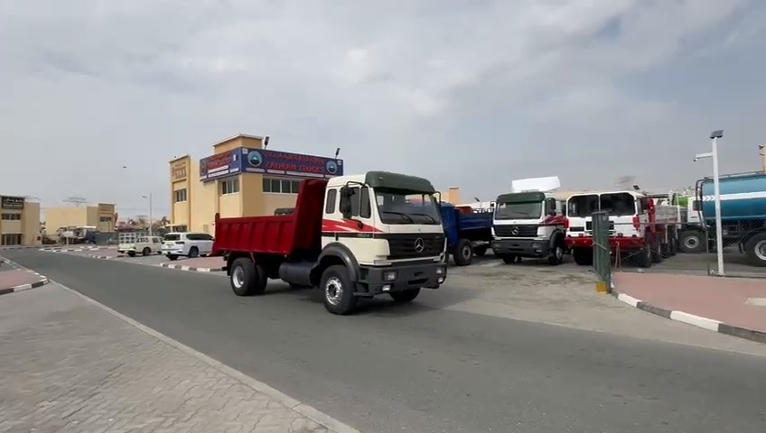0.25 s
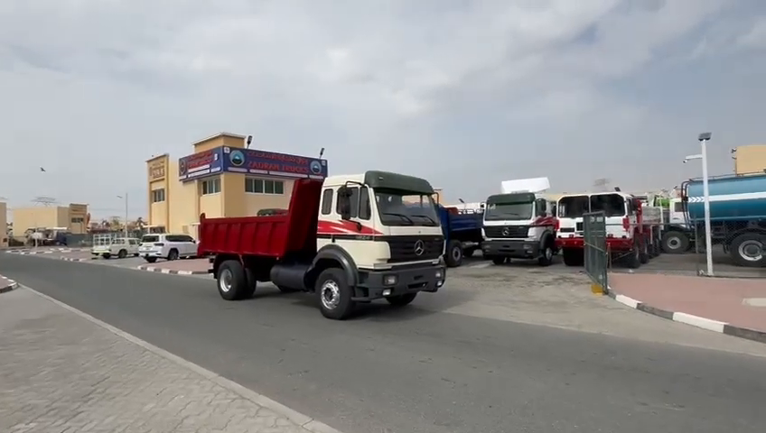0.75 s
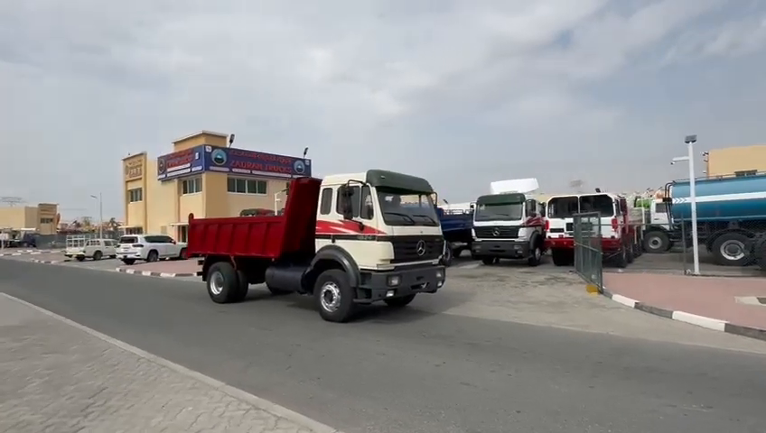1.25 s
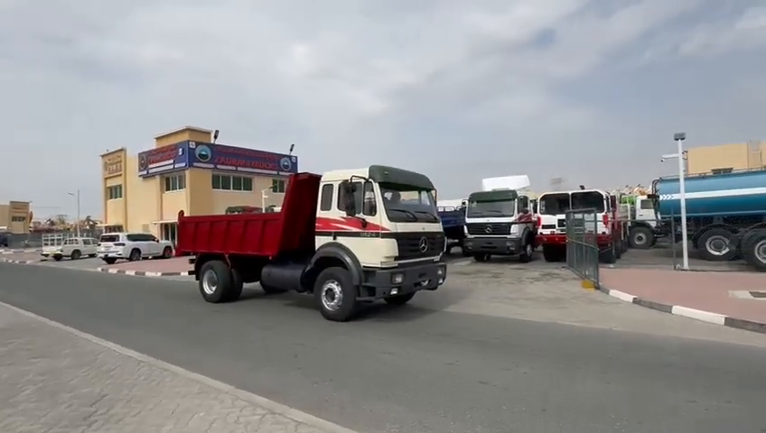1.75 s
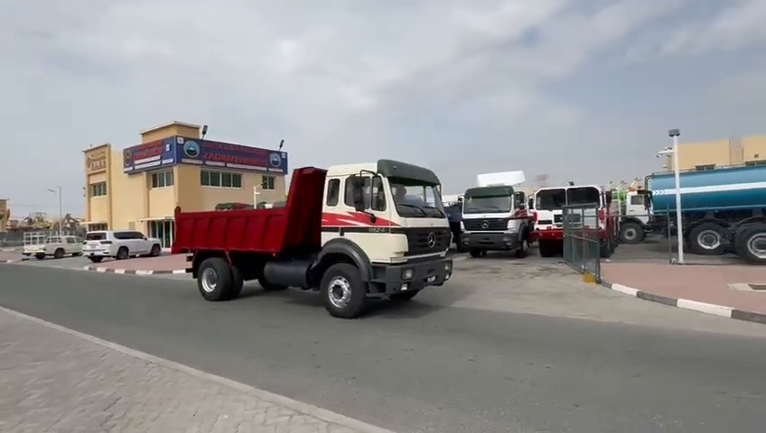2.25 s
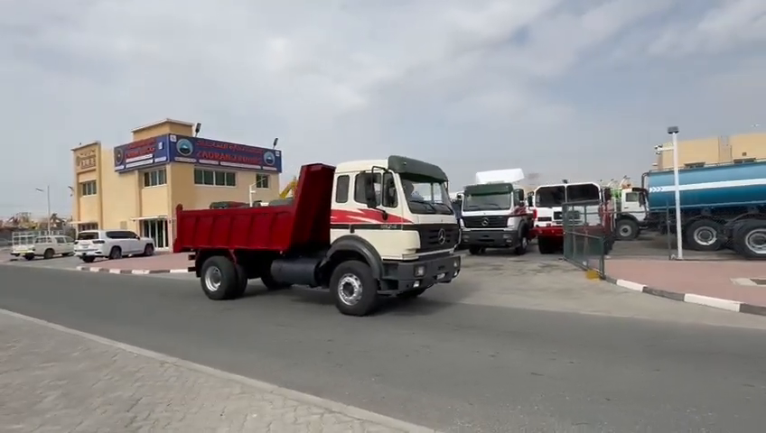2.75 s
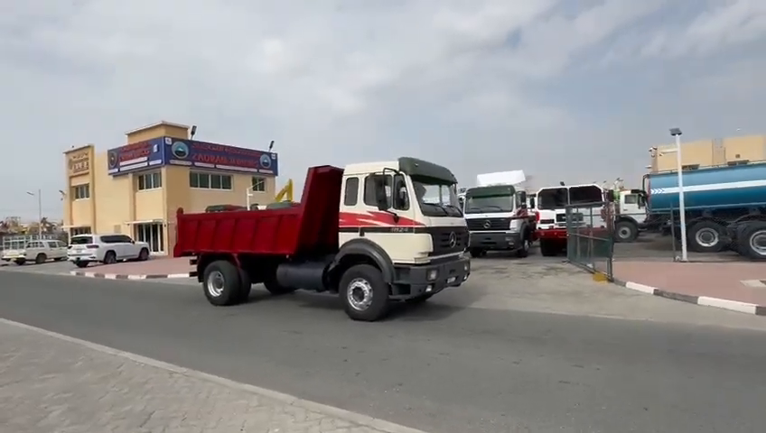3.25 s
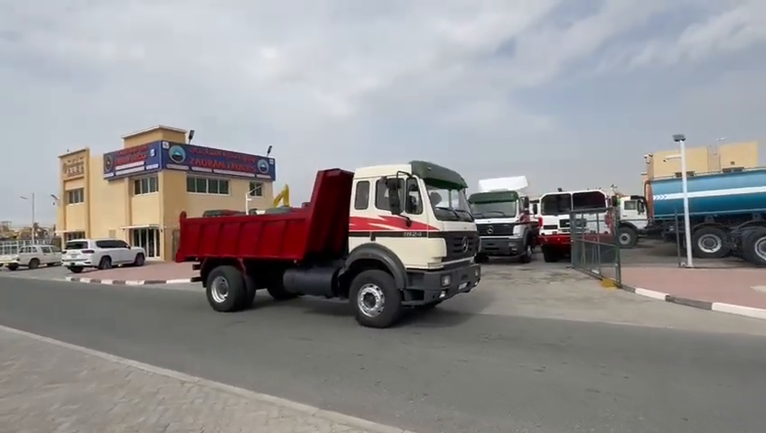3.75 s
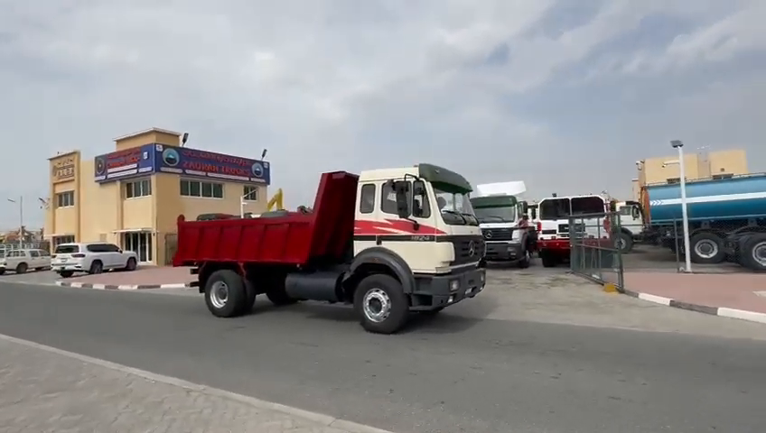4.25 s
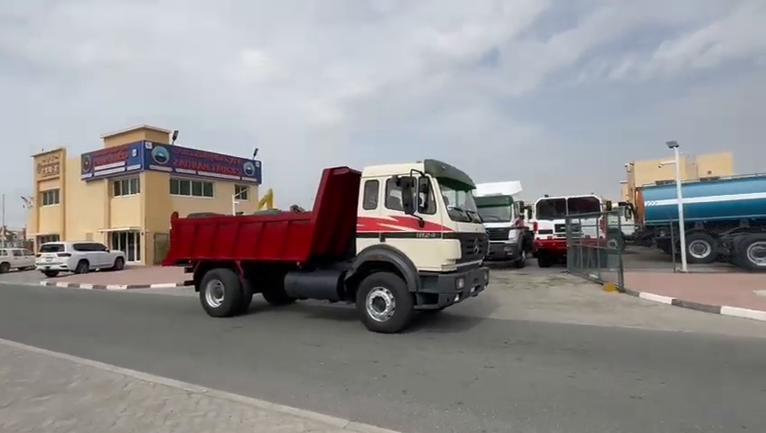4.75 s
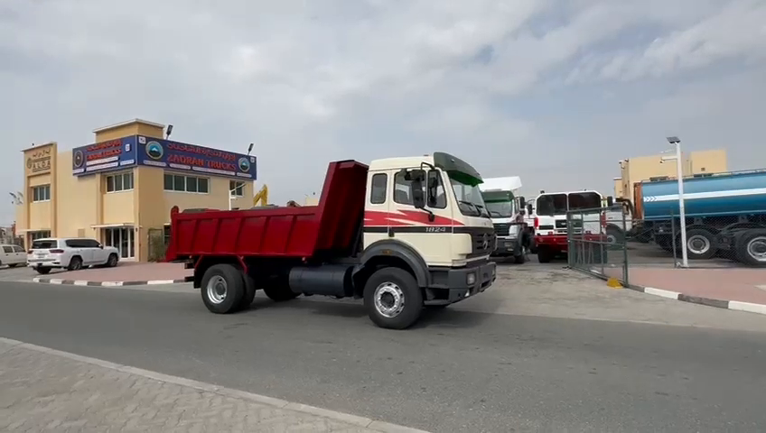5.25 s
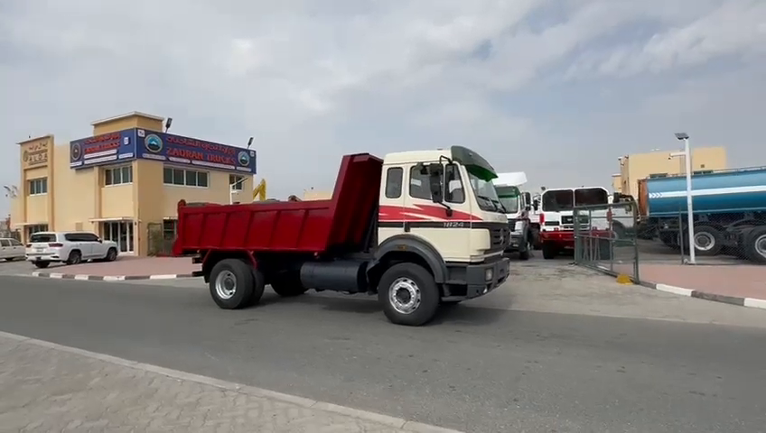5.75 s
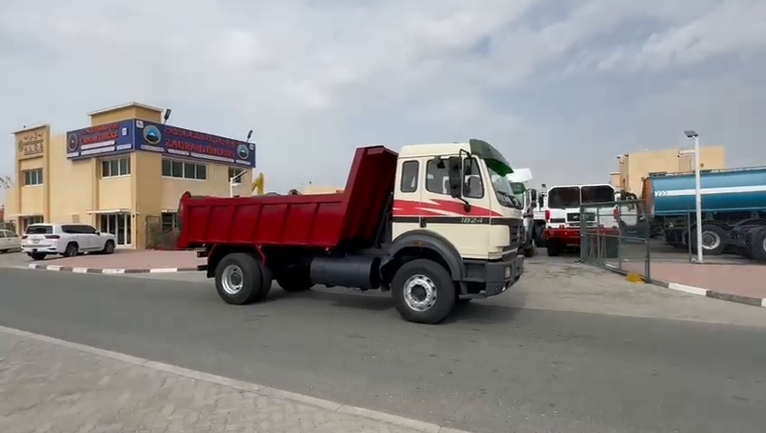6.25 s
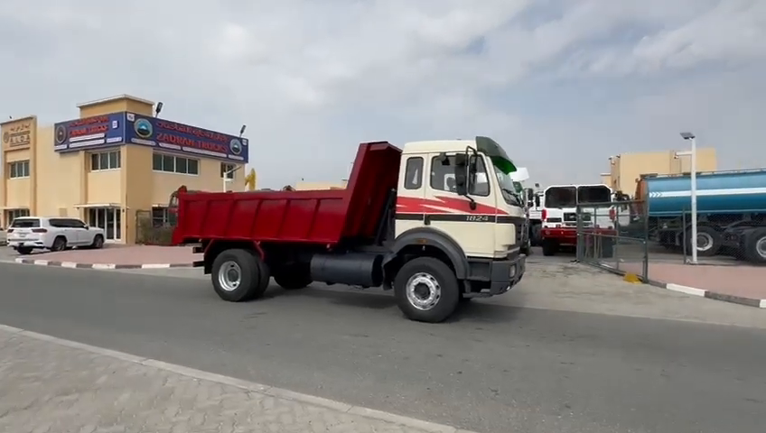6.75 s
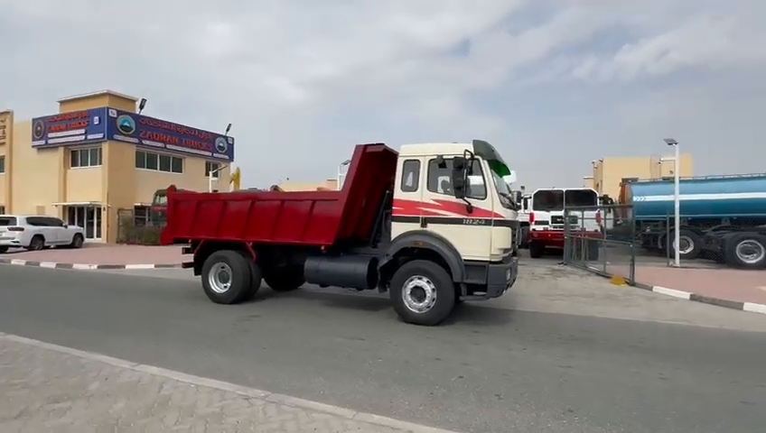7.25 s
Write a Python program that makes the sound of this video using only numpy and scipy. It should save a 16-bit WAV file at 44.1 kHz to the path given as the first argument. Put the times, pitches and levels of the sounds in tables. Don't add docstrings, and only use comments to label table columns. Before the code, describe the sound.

In an open roadside yard, a six-cylinder diesel idles with a steady rapid knock and rough roar, slightly duller at first and closer after two seconds. Around four seconds the empty steel tipper body clanks and brake air bursts out. Strong gusts slap the handheld phone at mid-point, then short air puffs and metal rattles continue while the engine chugs to the end.

```python
import sys
import numpy as np
from scipy import signal
from scipy.fft import rfft, irfft, next_fast_len
from scipy.io import wavfile
from scipy.ndimage import uniform_filter1d, map_coordinates

SR = 44100
rng = np.random.default_rng(int(sys.argv[2]) if len(sys.argv) > 2 else 0)


def master(y):
    cut = np.clip(np.atleast_2d(y).T, -1, 1)
    pcm = np.round(cut * 32767)
    wavfile.write(sys.argv[1], SR, pcm.astype(np.int16))


def invert_db(x):
    u = np.asarray(x, float) / 20
    return 10 ** u


N = 330309
SIDES = np.array([[.5], [-.5]])


def unit(x):
    return x / np.sqrt(np.mean(x ** 2) + 1e-20)


def along(points, hz):
    f, v = np.transpose(points)
    return np.interp(np.log(hz + 1), np.log(f + 1), v)


def curves(rows):
    s, *cols = np.transpose(rows)
    return [np.interp(np.arange(N) / SR, s, c) for c in cols]


def wobble(rate):
    knots = rng.standard_normal(int(N * rate / SR) + 4)
    return map_coordinates(knots, [np.arange(N) * rate / SR])


def filtered(x, response):
    m = next_fast_len(N + 8192)
    return irfft(rfft(x, m) * response(np.fft.rfftfreq(m, 1 / SR)), m)[..., :N]


def split(x, edge_hz):
    low = filtered(x, lambda hz: 1 / (1 + (hz / edge_hz) ** 6))
    return unit(low), unit(x - low)


def rush(spectrum, patchy_db):
    z = signal.stft(rng.standard_normal((2, N)), nperseg=512)[2]
    field = uniform_filter1d(rng.standard_normal(z.shape[1:]), size=4, axis=0)
    field = uniform_filter1d(field, size=8, axis=1)
    pair = signal.istft(z * invert_db(patchy_db * unit(field)), nperseg=512)[1][:, :N]
    return unit(filtered(pair, lambda hz: invert_db(along(spectrum, hz))))


def blend(pair, alike):
    turn = np.arccos(np.clip(alike, -1, 1)) / 2
    shared, opposed = np.cos(turn) * pair[0], np.sin(turn) * pair[1]
    return np.array([shared + opposed, shared - opposed])


# frequency in Hz, left-right likeness.
PORT_LIKENESS = [(60, 1.1), (300, 0.92), (700, 0.67), (2000, 0.55), (4500, 0.23), (8500, 0.19),
                 (10700, 0.14), (10950, 4.2)]
# frequency in Hz, lead of the left in radians.
PORT_LEAD = [(60, -9), (260, -1), (950, -0.5), (2500, 0.95), (3200, 3.5), (5300, 5), (6500, 3), (9500, 4.5),
             (10800, 0.5)]
# frequency in Hz, left minus right in dB.
PORT_BALANCE = [(100, -10), (350, 10), (640, -3), (1160, -4), (1900, -8.5), (2600, -5.5), (3790, 2.5),
                (6850, 4), (10800, -3.5)]


def ports(pair):
    m = next_fast_len(N + 8192)
    hz = np.fft.rfftfreq(m, 1 / SR)
    half = invert_db(along(PORT_BALANCE, hz) / 2) * np.exp(.5j * along(PORT_LEAD, hz))
    return irfft(blend(rfft(pair, m), along(PORT_LIKENESS, hz)) * [half, 1 / half], m)[:, :N]


# time in seconds, strength in dB, rumble likeness from -1 to 1.
BREEZE = [(0, -37.5, 0.98), (.7, -39, 0.71), (1.5, -39, 0.98), (2.8, -36.5, 0.99), (3.3, -37.5, 0.23),
          (3.8, -36, -0.76), (4.3, -34, -0.99), (4.9, -38, -0.055), (5.7, -34.5, -0.47),
          (6.4, -40.5, 0.056), (6.9, -36.5, 0.0025), (7.49, -31.5, -0.66)]
# time in seconds, length in seconds, flap level in dB, rumble over flap in dB.
GUSTS = [(0.2, 0.011, -39, 0), (0.727, 0.087, -44, 7.5), (0.994, 0.083, -37, -4.5), (1.172, 0.034, -40, 4),
         (1.87, 0.18, -59, 23), (1.98, 0.049, -47, -6), (2.379, 0.022, -29, -9), (2.984, 0.37, -42.5, -24),
         (3.146, 0.056, -33, -19), (3.301, 0.052, -29.5, -3.5), (3.512, 0.1, -33, -4),
         (4.415, 0.15, -36.5, -13), (4.517, 0.1, -31.5, 3.5), (5.218, 0.15, -32.5, -6),
         (5.44, 0.043, -27, -2), (5.492, 0.075, -26, -12), (5.58, 0.18, -26, -15), (5.71, 0.16, -30, -14),
         (5.813, 0.094, -29.5, -12), (5.93, 0.14, -41.5, -1), (6.07, 0.081, -32.5, -12),
         (6.982, 0.1, -35, -11), (7.148, 0.11, -27, -17), (7.271, 0.045, -25, -15),
         (7.382, 0.085, -26, -20), (7.49, 0.038, -21.5, -6)]
# frequency in Hz, level in dB per Hz.
RUMBLE_SPECTRUM = [(15, -56), (25, -18), (54, 1.5), (81, 4), (160, -1), (210, -18), (350, -120)]
# frequency in Hz, level in dB per Hz.
FLAP_SPECTRUM = [(65, -21), (110, -7.5), (150, -5.5), (183, -1), (286, -3.5), (520, -10.5), (680, -25.5),
                 (1140, -120)]
# frequency in Hz, level in dB per Hz.
SPILL_SPECTRUM = [(180, -44), (300, 14), (432, 0), (584, 9), (968, 4), (1500, -9.5), (1950, -49),
                  (3300, -120)]


def wind():
    t = np.arange(N) / SR
    breeze_db, alike = curves(BREEZE)
    rumbling = invert_db(breeze_db + wobble(9))
    flapping = invert_db(breeze_db - 2 + .8 * wobble(12))
    for s, length, db, low_db in GUSTS:
        late = (t - s) / length + 0.26
        gust = invert_db(db) * np.exp(-.5 * (late / np.where(late < 0, 0.26, 0.58)) ** 2)
        rumbling += gust * invert_db(low_db)
        flapping += gust

    def left_leads(pair, radians):
        return unit(filtered(pair, lambda hz: np.exp(1j * radians * SIDES) + 0 * hz))

    rumble_lumps = invert_db(0.77 * np.array([wobble(24), wobble(30)]))
    rumble = blend(rumble_lumps * rush(RUMBLE_SPECTRUM, patchy_db=1), alike)
    flap_lumps = invert_db(1.65 * np.array([wobble(28), wobble(28)]))
    flap = blend(flap_lumps * rush(FLAP_SPECTRUM, patchy_db=1), .6)
    spill = blend(invert_db(0.42 * wobble(26)) * rush(SPILL_SPECTRUM, patchy_db=0.5), -.6)
    spill = invert_db(-7.5) * (flapping / invert_db(-27.5)) ** 0.7 * spill
    return rumbling * left_leads(rumble, -0.91) + flapping * (left_leads(flap, -1.2) + spill)


# time in seconds, peak in dB, frequency in Hz, left minus right in dB.
SLAPS = [(0.184, -22.5, 199, 3), (0.984, -30, 123, 0.5), (1.85, -25, 95, 0.0), (1.889, -26, 115, -6),
         (2.377, -23.5, 151, 1.5), (2.999, -27, 118, 2.5), (3.138, -26, 294, 0), (3.288, -23, 96.9, -4),
         (3.314, -19.5, 203, 1.5), (3.495, -24, 156, 4.5), (3.519, -20, 113, 2), (4.347, -22, 215, 2.5),
         (4.439, -20, 176, 2), (4.501, -16.5, 158, -1.0), (4.539, -20.5, 178, 0.5), (4.7, -29, 204, -2.5),
         (5.136, -24, 199, -0.5), (5.216, -16.5, 198, 4), (5.423, -15, 240, -3), (5.444, -17, 128, 0.0),
         (5.464, -10.5, 200, 0.5), (5.501, -14, 280, -1.5), (5.533, -17, 91.5, -2), (5.583, -16.5, 152, -4),
         (5.619, -21, 98, 3.0), (5.674, -16, 222, 0.5), (5.723, -19, 210, -0.5), (5.754, -22, 225, 0.0),
         (5.793, -20, 107, 0.0), (5.824, -19, 188, 3), (5.855, -22, 180, -1.5), (5.889, -26, 91.5, 2.0),
         (5.95, -21, 149, -3.5), (6.059, -27, 94.2, 0.0), (6.115, -24.5, 164, -0.5),
         (6.851, -21.5, 238, -3.0), (6.924, -19, 116, -3), (6.96, -19, 197, -0.5), (6.994, -19, 240, -0.5),
         (7.09, -20, 213, -0.5), (7.114, -22, 172, -0.5), (7.144, -20, 350, 0), (7.177, -23, 272, 0.0),
         (7.254, -14.5, 275, 2), (7.299, -22, 91.5, -3), (7.335, -14.5, 264, 1.0), (7.384, -18, 215, 1),
         (7.464, -15, 91.3, -1.5),
         (5.458, -13, 580, 0),
    (5.494, -20, 760, 0),
    (5.615, -19, 620, 0),
    (5.658, -19, 600, 0),
    (5.688, -18, 620, 0),
    (5.745, -21, 600, 0),
    (5.47, -17, 90, 0),
    (5.66, -18, 90, 0),
    (5.845, -19, 100, 0),
]
# frequency in Hz, lead of the left in radians.
SLAP_LEAD = [(90, -2.3), (180, -1.1), (300, -.6), (600, -2.6)]


def slaps():
    t = np.arange(SR // 20) / SR
    out = np.zeros((2, N + SR))
    for s, db, hz, pan_db in SLAPS:
        life = t * min(hz, 330) / 1.49
        swell = np.e * life * np.exp(-life)
        cycles = np.sin(2 * np.pi * (hz * t + rng.random()) + SIDES * along(SLAP_LEAD, hz))
        out[:, round(s * SR):][:, :len(t)] += invert_db(db - 4.5 + SIDES * pan_db) * swell * cycles
    return out[:, :N]


# time in seconds, length in seconds, level in dB, treble share from 0 to 1,
# left minus right in dB.
PUFFS = [
    (3.42, 0.083, -46, 0.1, -7),
    (4.925, 0.072, -53, 0, -3),
    (5.57, .05, -68, 0.9, -4),
    (6.041, 0.048, -40.5, 0, 7.5),
    (6.297, 0.04, -52, .02, -9),
    (6.65, 0.17, -46.5, 0.2, -1),
    (6.808, .07, -54, 0.73, -6),
    (6.93, 0.2, -53, 0.6, -3),
    (7.123, 0.12, -42, 0.62, -1),
]
# frequency in Hz, level in dB per Hz.
JET_SPECTRUM = [(1800, -38), (3000, -6.5), (4400, -6.5), (7200, -9), (8100, -5), (9700, -8), (11000, -8),
                (11900, -16), (13000, -60)]
# peak in seconds, level in dB, rise in seconds, fall in seconds, treble share from 0 to 1,
# left minus right in dB.
BRAKE_AIR = (4.392, -33.5, .016, .085, .5, -3)
# time in seconds, length in seconds, frequency in Hz, width in Hz, level in dB.
WHISTLE = (4.402, .034, 8135, 35, -40)
# time in seconds, peak in dB.
SEAT_TICKS = [
    (2.142, -35),
    (4.3525, -27),
    (6.258, -32),
]


def valves():
    t = np.arange(N) / SR
    dull, bright = split(ports(rush(JET_SPECTRUM, patchy_db=2)), 7000)

    peak_s, db, rise_s, fall_s, treble, pan_db = BRAKE_AIR
    shape = np.exp(-np.abs(t - peak_s) / np.where(t < peak_s, rise_s, fall_s))
    out = invert_db(db + pan_db * SIDES) * shape * ((1 - treble) * dull + treble * bright)

    s, length, hz, width, db = WHISTLE
    sung = unit(filtered(bright, lambda f: np.exp(-((f - hz) / width) ** 2)))
    out += invert_db(db - 9 * np.abs(2 * (t - s) / length) ** 3) * sung

    for s, db in SEAT_TICKS:
        late = t - s
        out += invert_db(db - 60 * np.abs(late) / .011) * (late > 0) * np.sin(2 * np.pi * 4500 * late)

    puffs = np.zeros((2, N))
    for s, length, db, treble, pan_db in PUFFS:
        late = t - s
        body = np.exp(-.5 * np.abs(2 * late / length) ** 3)
        tail = invert_db(-8.5) * (late > 0) * np.exp(-np.abs(late) / 0.13)
        air = (1 - treble) * dull + treble * bright
        puffs += invert_db(db + pan_db * SIDES) * np.maximum(body, tail) * air
    ragged = invert_db(.8 * wobble(40) + 1.2 * wobble(130))
    return out + ragged * puffs


# time in seconds, frequency in Hz, width in Hz,
# level in dB, t60 in seconds.
CLANKS = [
    (4.185, 1610, 495, -24, 0.075),
    (4.437, 1140, 200, -29, 0.12),
    (4.862, 1740, 200, -22.5, 0.11),
    (5.79, 1330, 700, -24, 0.061),
    (6.057, 1280, 300, -24, 0.22),
    (6.088, 1300, 400, -41, 0.32),
    (6.284, 4600, 500, -44, .15),
    (6.62, 3260, 500, -40, 0.49),
    (6.329, 1610, 500, -27, 0.16),
    (7.151, 1510, 910, -23, 0.032),
]


def tipper():
    t = np.arange(SR // 4) / SR
    body = np.zeros((2, N + SR))
    for s, hz, width, db, t60 in CLANKS:
        panel = signal.butter(2, [hz - width / 2, hz + width / 2], "bandpass", fs=SR, output="sos")
        rattle = unit(signal.sosfilt(panel, rng.standard_normal((2, len(t)))))
        body[:, round(s * SR):][:, :len(t)] += invert_db(db - 60 * t / t60) * (1 - np.exp(-t / 0.00041)) * rattle
    return body[:, :N]


def crank():
    t = np.arange(N) / SR
    turns = 5.677 + (28.0566 - .002 * t / 2) * t
    since = turns % 1
    return turns, turns.astype(int), since, since / np.gradient(turns) / SR


def per_firing(firing):
    return rng.standard_normal(firing.max() + 1)[firing]


def turned_away():
    return 1 / (1 + np.exp((5.3 - np.arange(N) / SR) / .2))


# frequency in Hz, t60 in seconds, level far off in dB,
# level nose on in dB, level side on in dB.
CYLINDERS = [(1957, 0.04, -1.5, 1, -4), (1868, 0.055, -4.5, 1, -9.5), (1822, 0.032, 2.5, 1, -6.5),
             (1765, 0.037, 1.5, -8, -2), (1816, 0.03, -7, -2, 0.4), (1772, 0.04, -6, -14, -9)]
TURNED_DB = [1.5, 0.5, 1.5, 1.5, -4, 1.5]


def knock_levels(firing, heading):
    _, _, far_db, nose_db, side_db = np.transpose(CYLINDERS)[:, firing % 6]
    near_db = nose_db + heading * (side_db - nose_db)
    far = 1 / (1 + np.exp((np.arange(N) / SR - 1.94) / 0.11))
    return near_db + (far_db - near_db) * far + turned_away() * np.array(TURNED_DB)[firing % 6]


KNOCK_LATE_MS = [1.5, 0.1, .8, 0.1, 1.6, .3]


def knocks(firing, age, size, db, heading):
    hz, t60 = np.transpose(CYLINDERS)[:2, firing % 6]
    t60 = t60 * (1 + 0.22 * heading)
    hz = hz * (1 + 0.008 * per_firing(firing))
    skew, phase, echo_draw = per_firing(firing), per_firing(firing), per_firing(firing)

    def ring(late, turn):
        first = np.sin(2 * np.pi * hz * late + turn)
        upper = np.sin(2 * np.pi * 1.08 * hz * late + turn + 0.08 * (36 + 14 * skew))
        return invert_db(db - 60 * late / t60) * (1 - np.exp(-late / .0026)) * (first + invert_db(-8) * upper)

    lit = np.clip(age - np.array(KNOCK_LATE_MS)[firing % 6] / 1000, 0, None)
    echo_age = np.clip(age - .009 - 0.00201 * echo_draw, 0, None)
    echo_db = -15 + 11 * turned_away() + 2 * per_firing(firing)
    echo = invert_db(echo_db) * ring(echo_age, 3 * echo_draw)
    left = ring(lit, phase) + echo
    right = ring(lit, phase + np.pi / 2 + .4 * skew) - echo
    return size * np.array([left, right])


# frequency in Hz, t60 in seconds, delay in seconds.
PANELS = [(589.6, 0.074, .0065), (1055.6, 0.068, .0065), (1496, 0.052, 0.00305)]
# low panel in dB, middle panel in dB, high panel in dB.
PANEL_DRIVE = [(-5, -12, -19), (-12.5, -12.5, -7), (-5, -9, -2.5), (-5.5, -13, -8), (-2.5, -6.5, -14),
               (-12, -9, -13)]


def panels(firing, age):
    out = np.zeros((2, N))
    for (hz, t60, late_s), db in zip(PANELS, np.transpose(PANEL_DRIVE)[:, firing % 6]):
        late = np.clip(age - late_s, 0, None)
        level = invert_db(db + 1.9 * per_firing(firing) - 60 * late / t60) * (1 - np.exp(-late / .0025))
        angle = 2 * np.pi * hz * (1 + .03 * per_firing(firing)) * late + 3 * per_firing(firing)
        out += level * np.sin(angle + [[0], [np.pi / 2]])
    return out


# frequency in Hz, width in Hz, level in dB.
BLOCK = [(579, 45, -5), (674.5, 15, -3), (705, 19.4, -1), (1060, 150, -7.5), (1596, 280, -16),
         (2455, 330, -19)]


def thud(firing, burst, size, knock_db):
    strike = np.diff(firing, prepend=firing[0]) * size * invert_db(knock_db / 2 + 17)

    def block(f):
        answer = 0
        for k, (hz, width, db) in enumerate(BLOCK):
            answer = answer + (-1) ** k * invert_db(db) * 1j * f * width / (hz * hz - f * f + 1j * f * width)
        late = np.exp(-2j * np.pi * f * .004)
        return answer * late * f ** 2 / (f ** 2 + 420 ** 2)

    return unit(filtered(burst * rng.standard_normal((2, N)) + strike, block))


# multiple of the firing rate, level over the roar in dB.
ORDERS = [(4, -11), (6, -13), (12, -20), (19, -16), (20, -11), (21, -14), (22, -13), (25, -19)]


def tones(turns):
    out = 0
    for order, db in ORDERS:
        drift = .012 * wobble(4)
        angle = 2 * np.pi * order * (turns + drift + rng.random())
        out = out + invert_db(-1.5 + db + 3.5 * wobble(3)) * np.sin(angle)
    return out * [[1], [0]]


# frequency in Hz, level in dB per Hz.
CLATTER_SPECTRUM = [(1760, -39), (3000, 2), (3450, 4), (3820, 2.5), (4650, -4), (5040, -8), (6880, -12.5),
                    (8670, -12.5), (9670, -13), (10700, -12.5), (11100, -12), (11900, -23.5), (15500, -137),
                    (22000, -120)]


def valve_gear(turns, burst, heading):
    one_valve = np.exp(-.5 * ((turns % 6 - 5.9) / 0.38) ** 2)
    pulse = 1 + 0.46 * burst + 0.48 * one_valve
    trail = 1 + 0.49 * np.exp(-((turns + 0.17) % 6) / 1.3)
    tappets, hiss = split(pulse * invert_db(wobble(9)) * rush(CLATTER_SPECTRUM, patchy_db=1), 4800)
    return invert_db(-51 + 2 * heading) * unit(trail) * tappets + invert_db(-50) * hiss


# time in seconds, roar in dB, load as knock over roar in dB,
# heading from 0 nose on to 1 side on.
TRUCK = [(0, -37, -6, 0.018), (1, -36, -10, 0.18), (1.9, -35, -3.5, 0.29), (2.4, -35.5, -2.5, 0.057),
         (3.5, -34, -1, 0.53), (4.2, -33.5, -10.5, 0.84), (5, -33.5, -5.5, 0.8), (5.8, -34.5, -4.5, 0.72),
         (6.2, -35, -6, 0.99), (6.8, -32.5, -9, 0.96), (7.49, -34, -4.5, 0.93)]
# frequency in Hz, level in dB per Hz.
ROAR_SPECTRUM = [(250, -24), (420, 0.5), (588, 12), (700, 8.5), (820, 3.5), (986, 11.5), (1210, 3.5),
                 (1480, 5.5), (1630, 3.5), (1870, 5.5), (2240, 1), (2480, 0.5), (2980, -2.5), (3190, -60),
                 (3300, -78), (4290, -93), (7260, -120)]


def engine():
    roar_db, load_db, heading = curves(TRUCK)
    turns, firing, since, age = crank()
    size = invert_db(.8 * per_firing(firing))
    knock_db = knock_levels(firing, heading)
    rise = 1 - np.exp(-since / 0.05)
    burst = size * rise * (np.exp(-since / 0.18) + 0.086 * np.exp(-since / 0.16))
    swell = 1 + 2.26 * size * rise * np.exp(-since / 1.77)

    roar = invert_db(-5) * thud(firing, burst, size, knock_db)
    roar += invert_db(1.5) * unit(swell * rush(ROAR_SPECTRUM, patchy_db=2))
    roar += tones(turns)
    knock = invert_db(load_db) * unit(knocks(firing, age, size, knock_db, heading))
    heavy = invert_db(roar_db) * (knock + invert_db(-9) * unit(panels(firing, age)) + roar)
    heavy = filtered(heavy, lambda f: 1 / (1 + (f / 3300) ** 8))
    return heavy + valve_gear(turns, burst, heading)


def scene():
    left, right = ports(engine() + tipper()) + valves()
    lag_ms = .11 * curves(TRUCK)[2]
    left = map_coordinates(left, [np.arange(N) - lag_ms * SR / 1000])
    return np.array([left, right]) + wind() + slaps()


# frequency in Hz,
# depth nose on in dB, depth side on in dB.
DROPOUTS = [(150, 30, 30), (300, 9, 9), (650, 9, 8), (830, 6.5, 4.5), (1000, 9, 8), (1300, 8, 7.5),
            (2700, 7, 7), (3050, 6, 5), (3150, -2, 0), (3300, -4, -1), (3550, -3.5, -.5), (3750, 1, 1),
            (4000, 0, 1), (4400, 4, 4), (5500, 2.5, 3.5), (6300, 4.5, 4.5), (6900, 4.5, -2.5),
            (7400, 4.5, -3.5), (7800, 4.5, 3), (8200, 4.5, 5), (9700, -1.5, 1), (10400, 4, 4),
            (11400, 30, 30)]


def dropouts(x):
    frame, grid, thin_hz = 1024, 523, 2600
    n, k = np.arange(2 * frame)[:, None] + .5, np.arange(frame) + .5
    frames = N // frame + 3
    window = np.sin(np.pi * n / (2 * frame))
    lapped = window * np.cos(np.pi / frame * (n + frame / 2) * k) * np.sqrt(2 / frame)
    rows = np.pad(blend(x, 0), [(0, 0), (2 * frame - grid, 3 * frame)])
    rows = rows[:, :(frames + 1) * frame].reshape(2, -1, frame)
    z = (np.concatenate([rows[:, :-1], rows[:, 1:]], axis=2) @ lapped).transpose(0, 2, 1)
    hz = k * SR / (2 * frame)
    t = (np.arange(frames) * frame + grid - frame) / SR

    def smooth(v):
        return uniform_filter1d(uniform_filter1d(v, size=14, axis=1), size=4, axis=2)

    band_db = 10 * np.log10(np.abs(smooth(np.abs(z) ** 2)) + 1e-20)
    chance_db = 3 * unit(smooth(rng.standard_normal(z.shape)))
    f, nose_db, side_db = np.transpose(DROPOUTS)
    heading = np.clip(np.interp(t, *np.transpose(TRUCK)[[0, 3]]), 0, 1)
    margin_db = np.outer(np.interp(hz, f, nose_db), 1 - heading)
    margin_db += np.outer(np.interp(hz, f, side_db), heading)
    margin_db -= 2.5 * np.outer(hz > thin_hz, np.exp(-(t / .8) ** 2))
    gust_db = uniform_filter1d(band_db[0, 8:18].mean(0), size=15)
    gust_db = np.clip(gust_db - np.median(gust_db), 0, 9)
    margin_db -= .4 * np.outer((hz > 480) & (hz < 1500), gust_db)

    share = np.abs(z) / invert_db(band_db)
    z = z * np.where(hz[:, None] > thin_hz, 0.93 * share ** 0.15 * (share > .55), 1)
    over_db = .6 * (band_db - np.median(band_db, axis=2, keepdims=True)) + chance_db
    kept = (over_db > -margin_db)[:, np.arange(frame) // 8 * 8]
    halves = (z * kept).transpose(0, 2, 1) @ lapped.T
    joined = (halves[:, 1:, :frame] + halves[:, :-1, frame:]).reshape(2, -1)
    return blend(joined[:, frame - grid:][:, :N], 0)


def roll_off(x):
    return signal.sosfilt(signal.butter(12, 12990, fs=SR, output="sos"), x)


def record(dry):
    stereo = filtered(dry, lambda hz: hz < 10900)
    mono_top = filtered(dry[1], lambda hz: (hz >= 10900) & (hz < 11770))
    return roll_off(dropouts(stereo + mono_top))


dry = scene()
out = record(dry)
master(out)
```